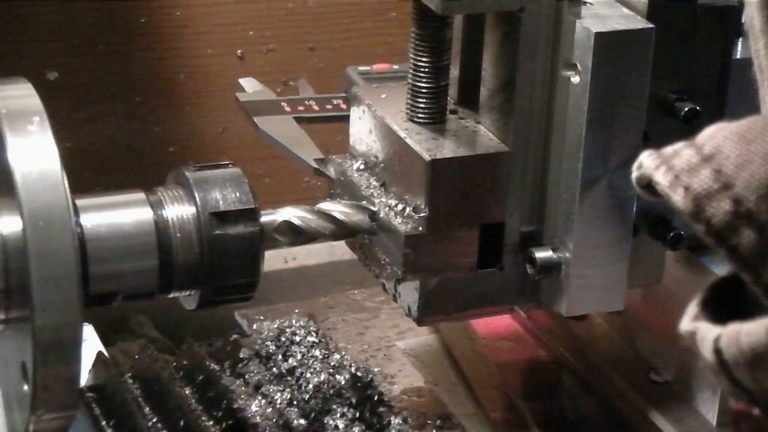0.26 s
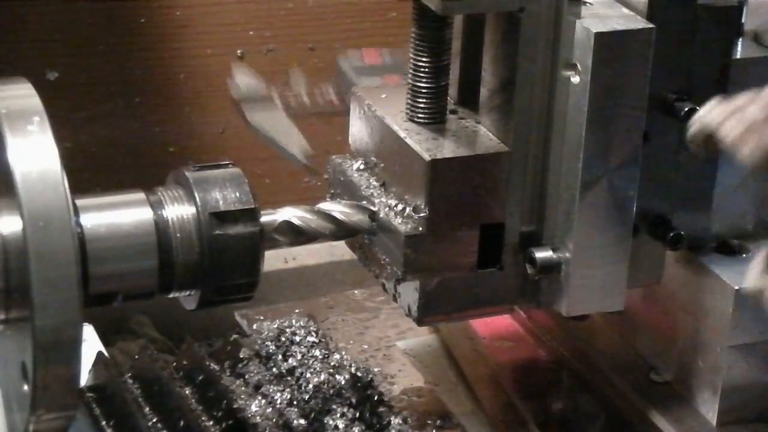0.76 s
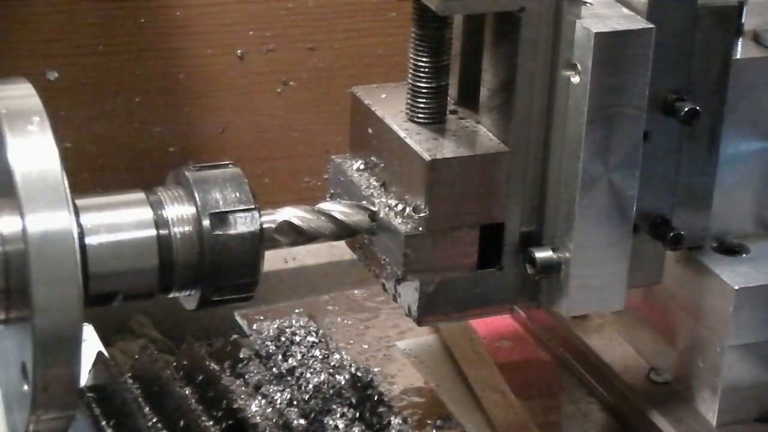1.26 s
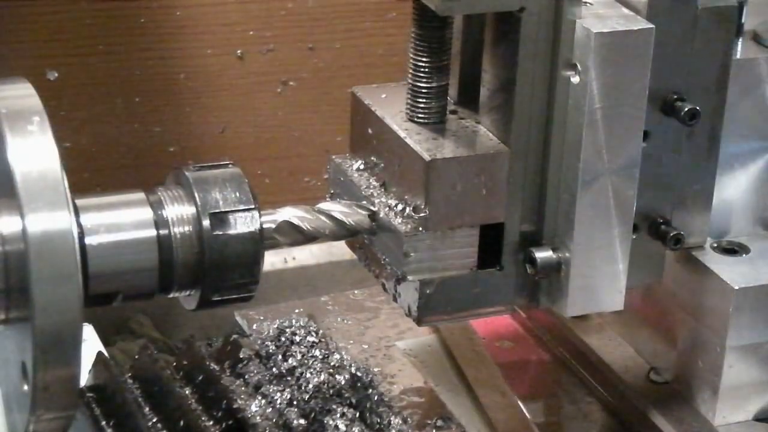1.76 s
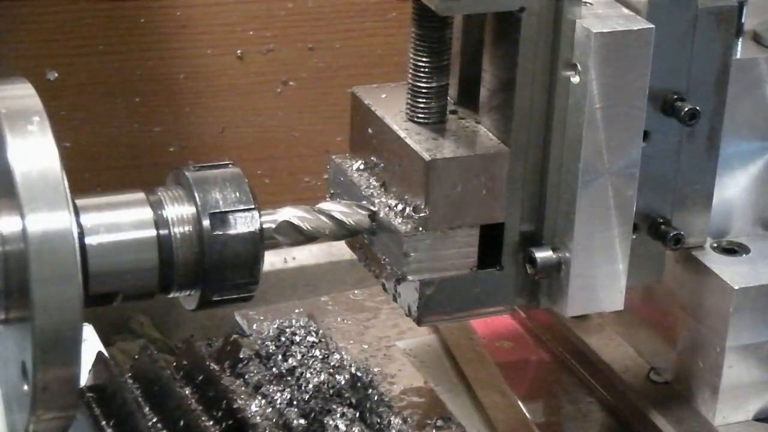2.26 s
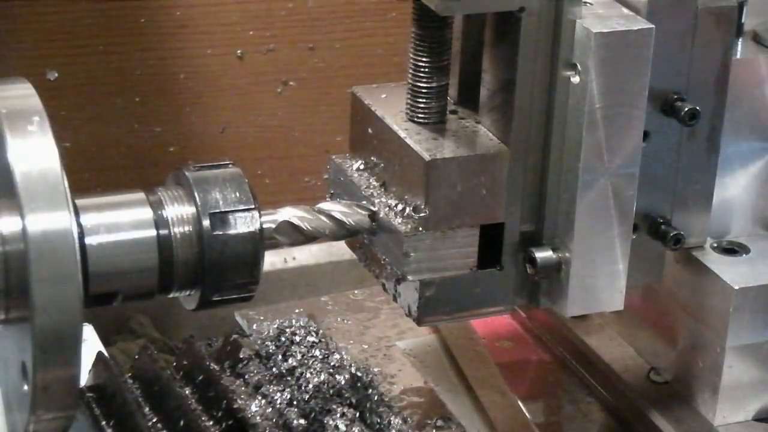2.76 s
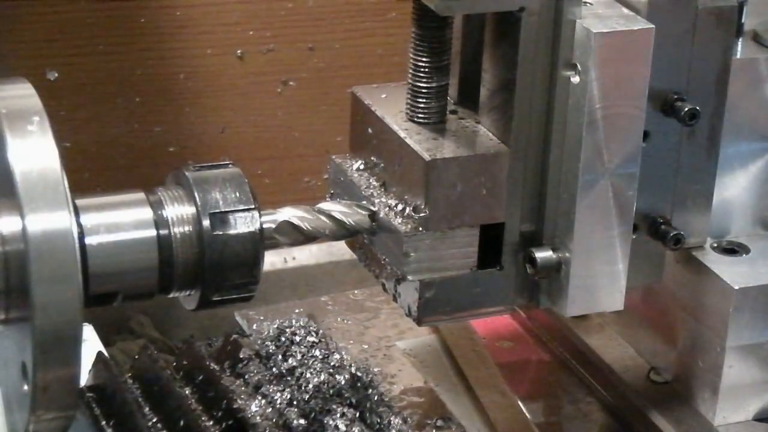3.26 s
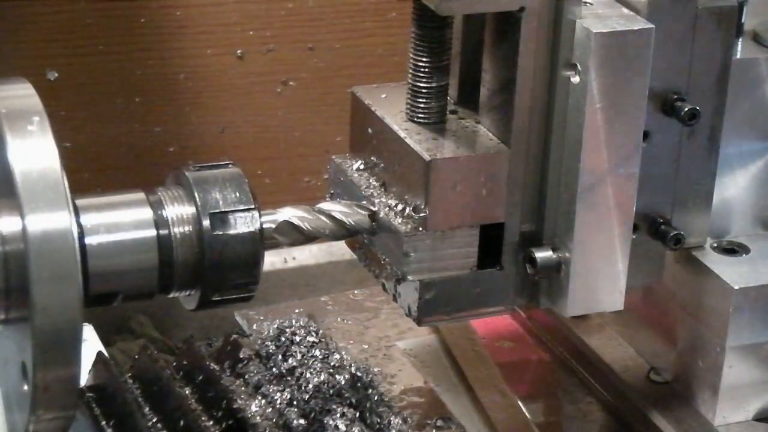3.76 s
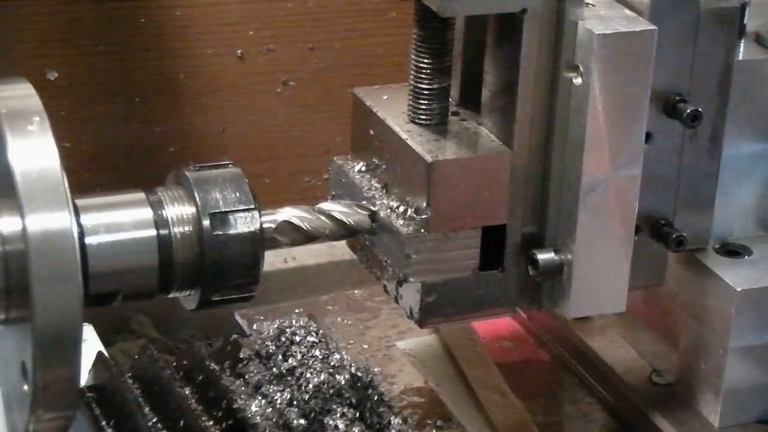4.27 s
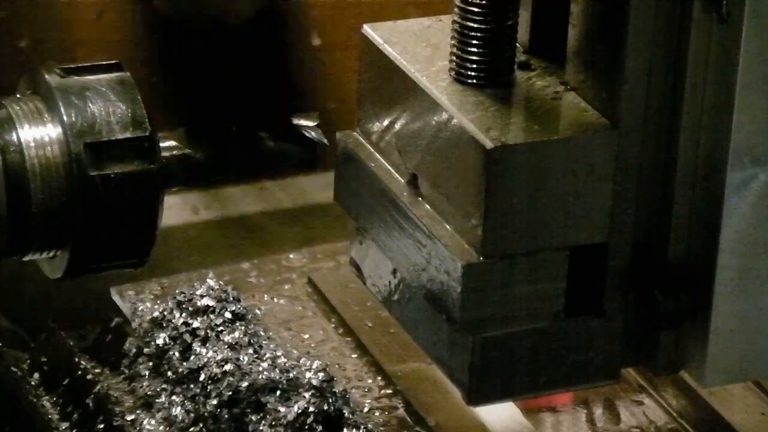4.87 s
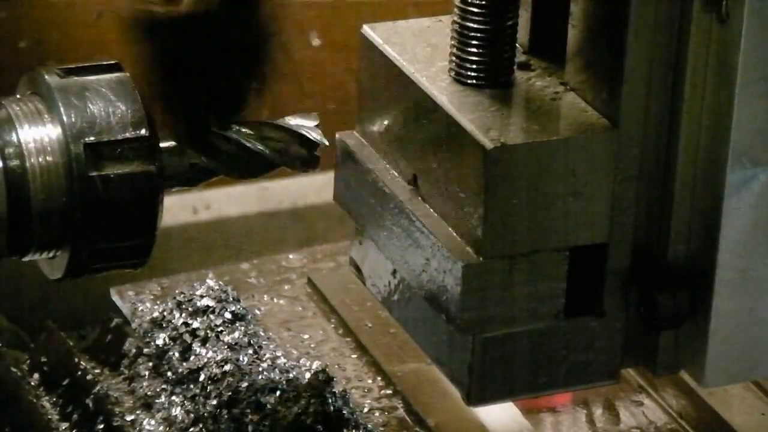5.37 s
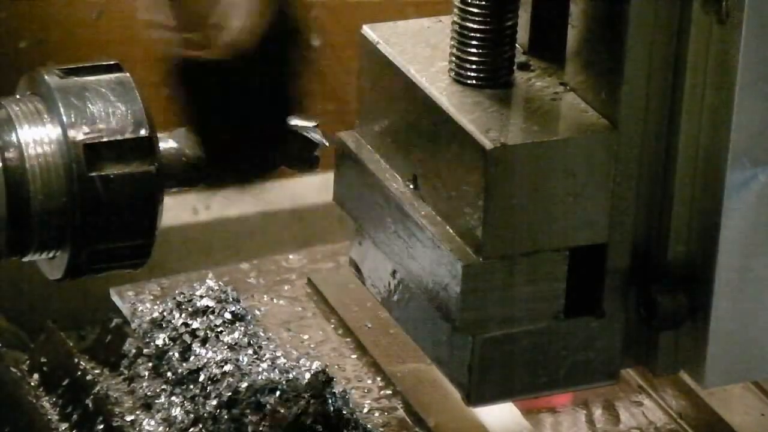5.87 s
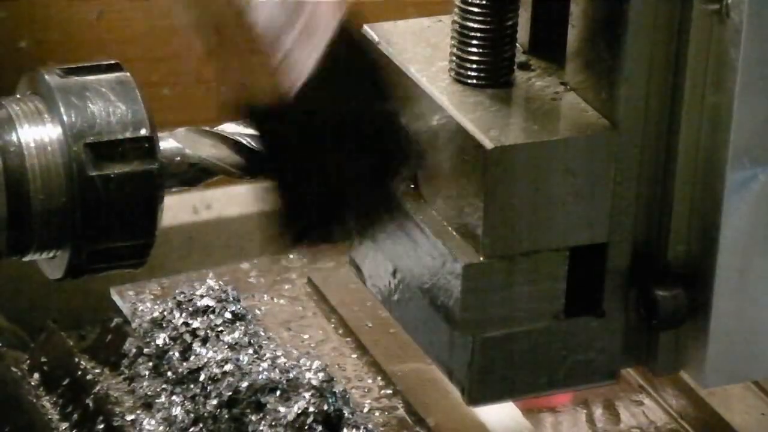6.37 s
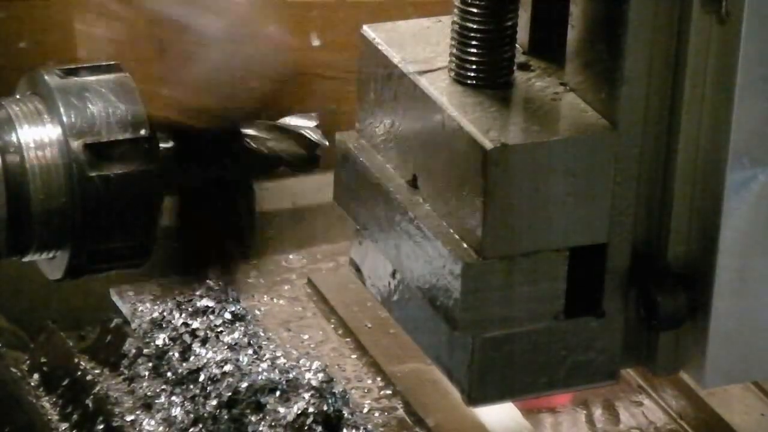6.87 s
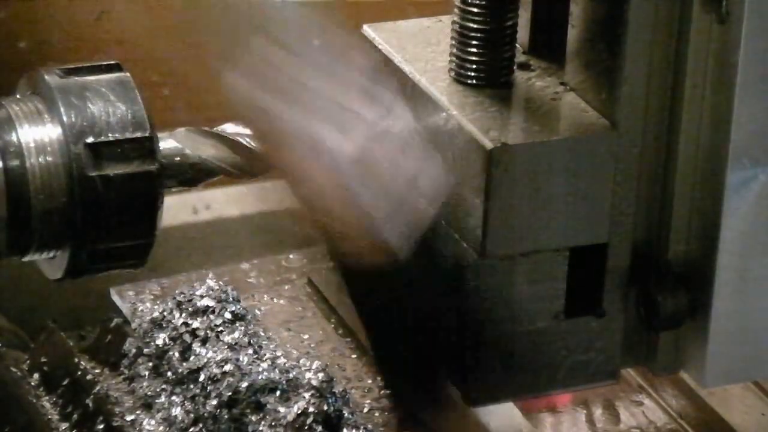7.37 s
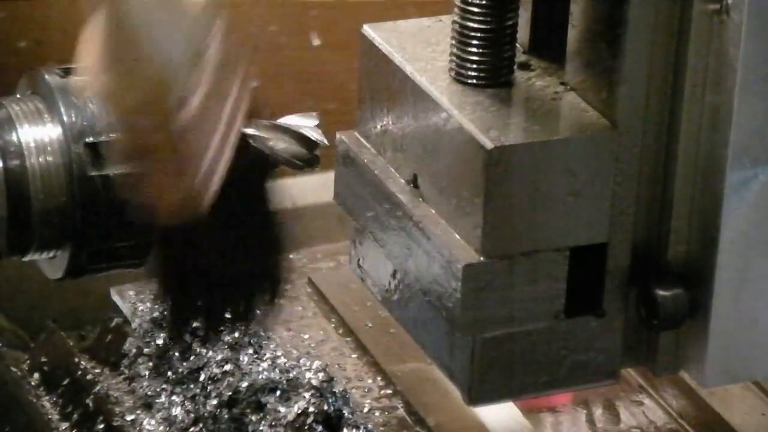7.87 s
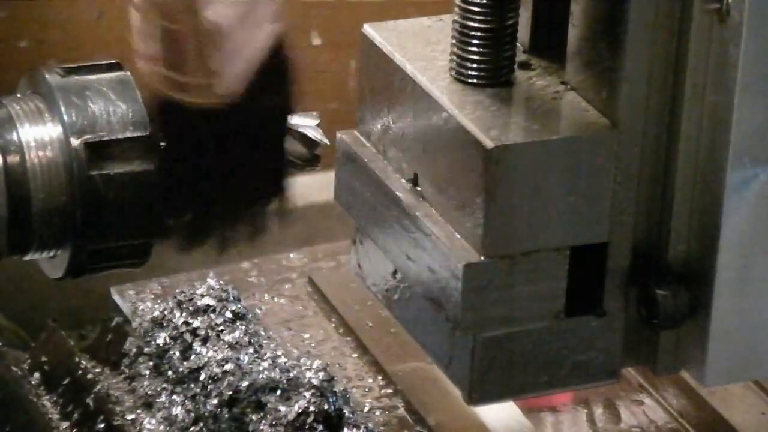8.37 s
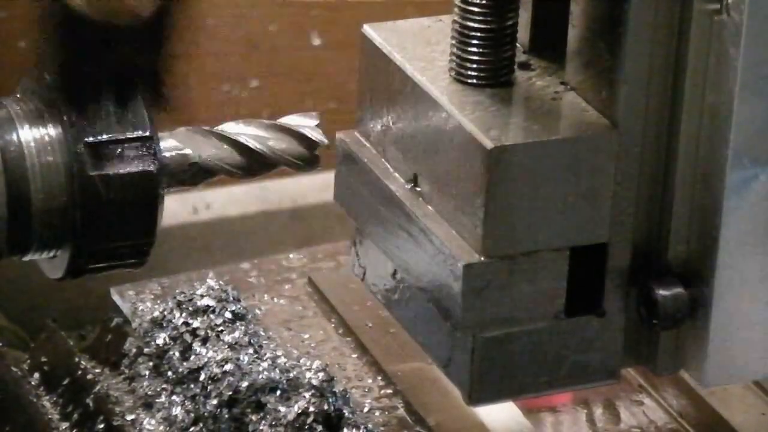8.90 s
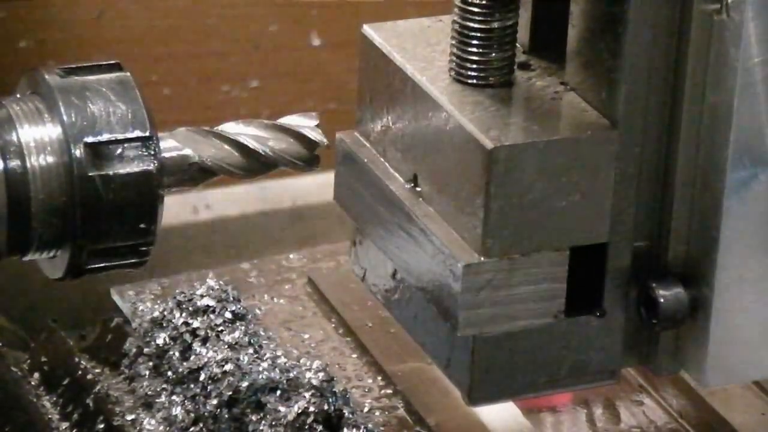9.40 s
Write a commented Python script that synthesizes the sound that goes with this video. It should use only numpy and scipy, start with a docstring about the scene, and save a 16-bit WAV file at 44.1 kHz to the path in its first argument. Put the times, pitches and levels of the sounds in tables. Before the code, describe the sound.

Someone rummages beside a workbench: steel tools clink, things slide softly over wood, a metal catch snaps and something wooden knocks, then bangs shut. After a split second of dead silence, a bristle brush sweeps metal chips off a steel vise in fourteen quick, hissy strokes, with tiny chips pattering down over a faint low hum. A stereo microphone stands close to the vise in a small workshop.

```python
"""A bristle brush sweeps metal chips off the steel vise of a small lathe in fourteen quick strokes, over a
faint low hum; the tips flick and scrape, loosened chips patter down. Before that, someone rummages beside the
bench: tools clink, things slide and knock, something wooden bangs shut, and then the sound drops out briefly.
Blows are clicks that ring resonances; friction is dense tiny impacts. A small stereo microphone stands close to
the vise."""
import sys
import numpy as np
from scipy import signal
from scipy.fft import rfft, irfft, next_fast_len
from scipy.io import wavfile
from scipy.ndimage import uniform_filter1d

SR = 44100
rng = np.random.default_rng(int(sys.argv[2]) if len(sys.argv) > 2 else 0)


def pcm_store(signal):
    """Save signal as 16-bit PCM."""
    levels = np.round(np.clip(np.atleast_2d(signal), -1, 1) * 32767)
    wavfile.write(sys.argv[1], SR, levels.astype(np.int16).T)


N = 425124
TIME = np.arange(N) / SR
SILENCE_S = (4.778, 4.888)

# stereo width of diffuse sound, close sound and background hiss: f/Hz, side minus mid/dB
DIFFUSE_WIDTH = [(60, -22.5), (400, -19.5), (1300, -26.5), (2400, -17), (4400, -9), (8000, -5), (15000, 3)]
NEAR_WIDTH = [(500, -25), (2400, -19), (4400, -10.5), (8000, -7.5), (15000, -2.5)]
HISS_WIDTH = [(60, -17), (700, -8.5), (2400, -7), (8000, -2), (15000, 0)]


def undb(db):
    """Decibels to gain."""
    return 10 ** (np.asarray(db) / 20)


def unit(x):
    """Scale to rms 1."""
    return x / np.sqrt(np.mean(x ** 2))


def gain_at(points, hz):
    """Gain from (f/Hz, level/dB) points on a log-frequency axis."""
    f, db = np.transpose(points)
    return undb(np.interp(np.log(hz + 1), np.log(f), db))


def shape(x, response):
    """Filter by a function of frequency."""
    size = next_fast_len(x.shape[-1] + SR // 10)
    hz = np.fft.rfftfreq(size, 1 / SR)
    return irfft(rfft(x, size) * response(hz), size)[..., :x.shape[-1]]


def colour(x, points):
    """Filter by (f/Hz, level/dB) points; rms 1."""
    return unit(shape(x, lambda hz: gain_at(points, hz)))


def resonate(x, modes, leak=0):
    """Parallel resonances (f/Hz, width/Hz, gain/dB); the share leak bypasses them."""
    return shape(x, lambda hz: leak + sum(undb(db) * 1j * hz * w / (f * f - hz * hz + 1j * hz * w)
                                          for f, w, db in modes))


def stereo(pair, width):
    """Mid and side to left and right: alike in the bass, wider in the treble."""
    side = shape(pair[1], lambda hz: gain_at(width, hz))
    return np.array([pair[0] + side, pair[0] - side])


def grains(rate_hz, scatter_db):
    """Two trains of tiny uneven impacts at the same random moments."""
    struck = rng.random(N) < rate_hz / SR
    impacts = rng.standard_normal((2, N)) * struck
    return impacts * undb(scatter_db * np.clip(rng.standard_normal(N), -2, 2))


def movement(at_s, run_up_s, held_s, db, t60_s=0.52):
    """Gain of one movement: speeds up, holds, dies away."""
    rise = np.clip((TIME - at_s) / run_up_s + 1, 0, 1) ** 2
    coast_s = np.maximum(TIME - at_s - held_s, 0)
    return undb(db) * rise * 1000 ** (-coast_s / t60_s)


def surges(table):
    """Gain with smooth humps and dips."""
    return undb(sum(db * np.exp(-((TIME - at_s) / half_s) ** 2) for at_s, half_s, db in table))


def waver(rate_hz, depth_db):
    """Randomly wandering gain."""
    hold = int(SR / rate_hz)
    steps = rng.standard_normal(1000)[np.arange(N) // hold % 1000]
    return undb(depth_db * uniform_filter1d(steps, size=hold))


def room(onset_s=0.002):
    """Stereo impulse response of the small workshop; the treble dies first."""
    decays = [(100, 0.39), (260, 0.53), (700, 0.53), (1840, 0.51), (4850, 0.55), (12800, 0.3)]  # reverberation: f/Hz, T60/s
    t = TIME[:SR]
    noise = rng.standard_normal((2, SR))
    centres = np.log([hz for hz, _ in decays])
    tail = 0
    for (_, t60_s), pick in zip(decays, np.eye(len(centres))):
        band = shape(noise, lambda hz: np.interp(np.log(hz + 1), centres, pick))
        tail += band * 1000 ** (-t / t60_s) / np.sqrt(t60_s)
    tail *= np.clip(t / onset_s - 0.5, 0, 1)
    return stereo(unit(tail) / np.sqrt(SR), DIFFUSE_WIDTH)


def blows(hits, modes, echo, tone_db, rattle, rattle_t60_s, leak, gain_db, main_db, main_q, soft_hz):
    """A click and a short chatter ring an object; the tone falls away either side of its main resonance.
    hits: t/s, relative level/dB, main f/Hz, fall below/(dB/oct), fall above/(dB/oct), room send/dB"""
    edges_hz = [60, 400, 1400, 3500, 8000, 16000]  # edges of the tone_db bands (thud, body, clack, ring, tick): f/Hz
    bands_hz = list(zip(edges_hz, edges_hz[1:]))
    filters = [signal.butter(3, pair, "band", fs=SR, output="sos") for pair in bands_hz]
    soft_contact = signal.butter(2, soft_hz, fs=SR, output="sos")
    out = np.zeros((2, N + 2 * SR))
    t = TIME[:SR // 4]
    click = 1.0 * (t == 0)
    for at_s, db, main_hz, fall_below, fall_above, room_db in hits:
        octaves = np.log2(bands_hz).mean(axis=1) - np.log2(main_hz)
        bands_db = np.array(tone_db) + octaves * np.where(octaves < 0, fall_below, -fall_above)
        chatter = rattle * rng.standard_normal((2, len(t))) * 1000 ** (-t / rattle_t60_s)
        force = np.array([click + chatter[0], chatter[1], click])  # mid, side, room feed
        ring = signal.sosfilt(soft_contact, resonate(force, modes, leak))
        # the spot struck favours some modes
        ring = resonate(ring, [(main_hz, main_hz / main_q, main_db)], leak=0.72)
        direct, radiated = 0, 0
        for sos, band_db in zip(filters, bands_db):
            band = signal.sosfilt(sos, ring)
            peak_rms = np.sqrt(uniform_filter1d(band[0] ** 2, size=110).max())
            part = band[:2] * undb(db + band_db + gain_db) / peak_rms
            direct += part
            radiated += unit(band[2]) * np.std(part[0])  # clean ring, energy of the whole blow
        sound = undb(room_db) * signal.fftconvolve(radiated[None], echo, axes=1)
        sound[:, :len(t)] += stereo(direct, NEAR_WIDTH)
        start = int(at_s * SR)
        out[:, start:start + sound.shape[1]] += sound
    return out[:, :N]


def shop_hiss(level_db=-60):
    """Steady noise of the quiet shop."""
    spectrum = [(18, -36.5), (32, -9.5), (56, 6), (85, -2.5), (130, -3.5), (190, -9.5), (290, -6.5),
                (640, -12), (1600, -13.5), (6500, -16.5), (9200, -17), (10500, -24), (15500, -26.5)]  # noise floor: f/Hz, relative level/dB
    return stereo(colour(rng.standard_normal((2, N)), spectrum), HISS_WIDTH) * undb(level_db)


def electric_ticks(rate_hz=46.875, share=0.65):
    """Faint one-sided electrical ticks on a steady beat, many skipped."""
    beats = (np.arange(int(N / SR * rate_hz)) * SR / rate_hz).astype(int)
    chance, size = rng.random((len(beats), 2)).T
    ticks = np.zeros(N)
    ticks[beats] = 0.0034 * (chance < share) * (1 + 0.5 * size)
    return ticks


def tool_clinks(echo):
    """Steel tools touch, chatter and ring."""
    hits = [(0.843, -53, 1700, 7, 4, 4), (0.937, -46.5, 2300, 7.5, 6, 5), (0.973, -28, 3960, 9.5, 4, -5.5),
            (1.121, -47, 3040, 8.5, 6.5, 7.5), (1.172, -40, 2940, 15, 5.5, -5.5),
            (1.832, -33, 5960, 8.5, 5, 5.5), (1.835, -30, 5900, 15, 10, -10), (2.037, -49, 5370, 5, 18, 1),
            (2.102, -46.5, 3380, 6.5, 13, 1)]  # contacts: columns as in blows()
    modes = [(2050, 180, -39), (2840, 390, -8), (3600, 180, -10), (4340, 150, 1), (4650, 91, 3.5),
             (5010, 100, 3), (5460, 170, 5), (5780, 150, -1), (6160, 450, -6), (7000, 520, -24),
             (8800, 220, -9), (10400, 300, -13), (10900, 400, -15)]  # steel resonances: f/Hz, width/Hz, gain/dB
    return blows(hits, modes, echo, tone_db=[13.5, 1, 0.5, -1, -2], rattle=0.85, rattle_t60_s=0.045,
                 leak=0.17, gain_db=0, main_db=4, main_q=3.9, soft_hz=14000)


def dragging(slips):
    """Things pushed over the wooden bench: dense slips make a rub, a hollow rumble and a dry hiss."""
    pushes = [(1.38, 0.38, 0.54, -62, -62, -64), (1.45, 0.059, 0.065, -56, -64.5, -65.5),
              (2.3, 0.35, .71, -64, -67, -66), (2.435, .015, 0.014, -74, -56, -56.5),
              (3.29, 0.058, 0.013, -38, -47, -44.5), (3.47, 0.076, 0.06, -53, -61, -56),
              (3.69, 0.077, 0.06, -45.5, -50, -61), (3.976, 0.089, 0.0084, -53, -50, -50),
              (4.15, 0.6, 0.57, -60.5, -58, -64.5), (4.5, 0.14, 0.025, -63, -72, -73),
              (4.755, 0.023, 0.018, -58, -61, -67)]  # full speed t/s, run-up/s, held/s, relative rub/dB, rumble/dB, hiss/dB
    # friction spectra: f/Hz, relative level/dB
    rub = [(300, -11.5), (520, -1.5), (660, 4.5), (820, 2), (1050, 1), (1400, -0.5), (2200, -4.5),
           (4000, -51)]
    rumble = [(60, -20.5), (115, 7.5), (150, 3), (190, -11), (250, 5.5), (350, -0.5), (470, 3),
              (650, -30.5)]
    hiss = [(1200, -28.5), (2600, 3), (4500, -0.5), (6000, -4), (7500, -9), (10000, -12.5), (12500, -22.5),
            (15500, -29.5)]
    out = 0
    for layer, (spectrum, gain_db) in enumerate([(rub, -1), (rumble, -2), (hiss, 1)]):
        motion = sum(movement(at_s, run_up_s, held_s, levels_db[layer])
                     for at_s, run_up_s, held_s, *levels_db in pushes)
        out += undb(gain_db) * colour(slips, spectrum) * motion
    return out


def light_taps(echo):
    """Light things ring briefly as they are picked up and set down."""
    hits = [(1.455, -51, 721, 2.2, 5, -3), (1.619, -46.5, 645, 7.8, 13, -7),
            (4.166, -43, 1720, 5.8, 3.7, 5), (4.43, -40, 1570, 9.9, 4.5, -.7),
            (4.487, -45.5, 2100, 5.9, 9.3, 2.5), (4.529, -46, 2010, 1.1, 5.3, -4),
            (4.651, -38, 1620, 2.3, 2, 0.5), (4.746, -39.5, 1900, 1.5, 5.2, -9)]  # contacts: columns as in blows()
    modes = [(247, 24, 27), (430, 57, 6), (1020, 370, -2.5), (1560, 25, 1), (1910, 56, -9.5),
             (2030, 150, -18), (3080, 350, -16), (5050, 1350, 3)]  # object resonances: f/Hz, width/Hz, gain/dB
    return blows(hits, modes, echo, tone_db=[-1.3, -1.6, -0.39, 3.4, -2.6], rattle=0.29,
                 rattle_t60_s=0.066, leak=0.29, gain_db=1.5, main_db=-4, main_q=8.6, soft_hz=9000)


def metal_runner():
    """A metal runner sings faintly as it slides."""
    modes = [(1385, 120, 5.5), (4400, 72, -0.5), (10900, 500, -16)]  # runner resonances: f/Hz, width/Hz, gain/dB
    slide = (2.5, 0.7, 0.6, -60)  # t/s, run-up/s, held/s, level/dB
    return unit(resonate(rng.standard_normal((2, N)), modes)) * movement(*slide)


def wood_knocks(echo):
    """Wood knocks and bangs shut, with little chatter."""
    hits = [(2.426, -44.5, 2890, 6, 14, 2), (3.12, -17, 833, 6.6, 4.8, .8), (3.745, -13.5, 1550, 5, 14, -3),
            (3.752, -8.5, 2050, 5.3, 9.6, -1), (3.777, -19.5, 2000, 1.9, 5.9, 1),
            (3.814, -26, 1600, 0.6, 5.7, -1.2)]  # contacts: columns as in blows()
    modes = [(116.8, 3.5, 0.5), (142, 15, 1.5), (268, 23, -6), (283, 14, -4.5), (359, 15, -2),
             (386, 4.6, 2.5), (664, 310, -1), (790, 35, -4.5), (1140, 230, -4.5), (1230, 26, 3),
             (1570, 110, 3), (1750, 110, 5.5), (1864, 63, 6), (1950, 68, 14.5), (2104, 33, 10),
             (2293, 41, -21), (4770, 570, -5.5), (5700, 950, -11)]  # wood resonances: f/Hz, width/Hz, gain/dB
    return blows(hits, modes, echo, tone_db=[1, 0, -1, 0.5, 1], rattle=0.12, rattle_t60_s=0.055,
                 leak=0.1, gain_db=-1.5, main_db=2, main_q=1.7, soft_hz=7050)


def squeaks(slips):
    """Rubbing surfaces squeak: their slips ring one narrow resonance per squeak."""
    rubs = [(2.85, .05, .02, -62, 3240, 70), (2.84, .12, .03, -71, 11300, 500),
            (3.46, .03, .025, -46, 650, 60), (4.2, .1, .17, -67, 10000, 700)]  # t/s, run-up/s, held/s, level/dB, f/Hz, width/Hz
    out = 0
    for at_s, run_up_s, held_s, db, hz, width_hz in rubs:
        ring = signal.lfilter(*signal.iirpeak(hz, hz / width_hz, fs=SR), slips)
        out += unit(ring) * movement(at_s, run_up_s, held_s, db, t60_s=0.4)
    return out


def catch_snaps(echo):
    """A metal catch snaps and rings."""
    hits = [(3.022, -16.5, 2850, 4.16, 4.2, -0.73), (3.296, -26, 2050, 7, 4.5, -1.8)]  # contacts: columns as in blows()
    modes = [(1090, 240, -15), (1900, 190, -8.5), (2850, 330, -10), (3010, 140, -14.5), (5270, 260, 8),
             (5500, 180, -7), (5960, 260, 2), (6160, 1100, -11.5), (9120, 200, -12.5), (10800, 780, -6)]  # catch resonances: f/Hz, width/Hz, gain/dB
    return blows(hits, modes, echo, tone_db=[0.5, -1.4, -1.8, 2.3, -1], rattle=0.2, rattle_t60_s=0.046,
                 leak=0.24, gain_db=-0.5, main_db=-0.5, main_q=13, soft_hz=9500)


def room_hum(hum_db=-55.5, drone_db=-60.5, air_db=-59):
    """From the silence on, a wavering hum fills the room's low resonances, with a rush of air."""
    # room resonances: f/Hz, width/Hz, gain/dB
    hum_modes = [(45.4, 3.4, 8.5), (58.6, 13, 4), (77.8, 9.2, 2.5), (124.4, 13.6, 0.5), (143, 1.7, -16)]
    drone_modes = [(190, 20, -34), (222, 4.9, 8), (248.4, 27, 9), (296, 21, -2.5), (325, 12, -5),
                   (423.5, 11.7, 2.5)]
    # level changes: centre t/s, half length/s, rise/dB
    hum_swells = [(5.28, 0.054, -1), (6.55, 0.87, 3.5)]
    drone_swells = [(5.8, 0.43, 5.8), (8.62, 0.33, 6.3)]
    air_spectrum = [(40, -17), (200, -15), (450, -1.5), (700, -5.5), (1500, -1.5), (3000, -6), (6000, -6.5),
                    (9500, -11), (15500, -18.5)]  # shop air: f/Hz, relative level/dB
    hum = undb(hum_db) * surges(hum_swells) * unit(resonate(rng.standard_normal((2, N)), hum_modes))
    drone = unit(resonate(rng.standard_normal((2, N)), drone_modes))
    drone *= undb(drone_db) * surges(drone_swells)
    air = undb(air_db) * colour(rng.standard_normal((2, N)), air_spectrum)
    low = (hum + drone) * waver(rate_hz=10, depth_db=2.5)
    return (stereo(low, DIFFUSE_WIDTH) + stereo(air, HISS_WIDTH)) * (TIME > SILENCE_S[0])


def bristle_pressure(strokes, slide_s=0.03):
    """Bristles load up, slide over the vise edge and spring free; the last ones flick after."""
    pressure = np.zeros(N)
    for at_s, db, load_s, lag_s, flick_db, _ in strokes:
        free_s = at_s + slide_s
        flick_s = free_s + lag_s
        knots_s = [at_s - load_s, at_s - 0.5 * load_s, at_s, free_s, free_s + 0.01,
                   free_s + max(lag_s - 0.015, 0.013), flick_s, flick_s + 0.01, flick_s + 0.054]
        knots_db = [-30, -11, -0.5, 0, -4 + 0.5 * flick_db,
                    flick_db - 3.5, flick_db, flick_db - 7, flick_db - 22]
        pressure += undb(db + np.interp(TIME, knots_s, knots_db, left=-np.inf, right=-np.inf))
    return pressure


def tufts(hiss):
    """Tufts catch and slip on their own, so each band of the hiss flickers separately."""
    edges_hz = [2600, 3600, 4800, 6500, 9000, 11500]  # band edges: f/Hz
    out = 0
    for low_hz, high_hz in zip([0, *edges_hz], [*edges_hz, SR]):
        band = shape(hiss, lambda hz: (hz >= low_hz) & (hz < high_hz))
        out += band * waver(rate_hz=45, depth_db=2.2)
    return unit(out)


def brush(echo, bristle_db=1, scrape_db=-44, chip_db=-21, settle_s=0.37, room_db=-14, pan_db=0.7):
    """Thousands of bristle tips flick over the vise; loosened chips patter down after each stroke."""
    strokes = [(5.014, -47, 0.05, 0.091, -7.5, 0.5), (5.318, -45, 0.023, .063, -4, -2),
               (5.551, -42.5, 0.023, 0.067, -5.5, -1.5), (5.835, -39.5, 0.063, .056, -10.5, 1.5),
               (6.148, -38, .078, 0.025, -11, 1.5), (6.514, -46.5, 0.025, 0.067, -3, -2),
               (6.832, -45.5, 0.01, 0.068, -1.5, -1), (7.131, -46, .014, 0.038, 2.5, 1.5),
               (7.515, -41, 0.086, 0.085, -13.5, 2.5), (7.832, -39.5, 0.058, 0.031, -9.5, -1.5),
               (8.068, -37, 0.022, 0.029, -9.5, -6), (8.322, -41, 0.041, .042, -9, -1.5),
               (8.576, -41, 0.026, 0.081, -14.5, 3), (8.807, -39, 0.013, 0.068, -6, -2.5)]  # t/s, relative level/dB, loading/s, flick lag/s, flick/dB, scrape/dB
    # brush spectra: f/Hz, relative level/dB
    tip_spectrum = [(2000, -11.5), (4500, -4.5), (6500, 0.5), (8500, 1), (9500, 3.5), (12000, -1.5),
                    (15500, -6)]
    scrape_spectrum = [(300, -2.5), (700, -10), (1500, -5), (2000, -2.5), (2700, -2.5), (3100, -0.5),
                       (3700, -3.5), (5500, -0.5), (7000, -4), (11000, -45)]
    pressure = bristle_pressure(strokes)
    bristles = tufts(colour(grains(rate_hz=24000, scatter_db=0), tip_spectrum)) * pressure
    scrape = colour(grains(rate_hz=7000, scatter_db=4.5), scrape_spectrum)
    scrape *= (pressure / pressure.max()) ** 0.67  # grows less than the hiss: fast strokes are brighter
    starts_s, *_, bearing_db = np.transpose(strokes)
    scrape *= undb(np.interp(TIME, starts_s, bearing_db))
    pole = np.exp(-1 / (settle_s * SR))
    falling = signal.lfilter([1 - pole], [1, -pole], pressure)
    chips = colour(grains(rate_hz=20, scatter_db=19), tip_spectrum) * falling
    pair = undb(bristle_db) * bristles + undb(scrape_db) * scrape + undb(chip_db) * chips
    direct = stereo(pair, NEAR_WIDTH) * undb([[pan_db], [-pan_db]])
    return direct + undb(room_db) * signal.fftconvolve(pair[:1], echo, axes=1)[:, :N]


def rustles(slips):
    """Dense slips swell into soft rustles after the last stroke."""
    moves = [(9.22, 0.21, 0.095, -55), (9.46, .16, 0.19, -56)]  # t/s, run-up/s, held/s, level/dB
    spectrum = [(250, -9), (700, -1), (1500, -0.5), (3000, -2.5), (5500, -7.5), (9000, -12.5), (15500, -27)]  # rustle: f/Hz, relative level/dB
    return colour(slips, spectrum) * sum(movement(*row) for row in moves)


def scene():
    """Rummaging, then sweeping, in one room."""
    echo = room()
    impacts = tool_clinks(echo) + catch_snaps(echo) + wood_knocks(echo) + light_taps(echo)
    slips = grains(rate_hz=14000, scatter_db=2)
    singing = metal_runner() + squeaks(slips)
    rubbing = (dragging(slips) + rustles(slips)) * waver(rate_hz=25, depth_db=2.9)
    friction = stereo(rubbing + singing, DIFFUSE_WIDTH)
    return impacts + friction + brush(echo) + shop_hiss() + room_hum() + electric_ticks()


def record(dry):
    """The microphone has a narrow treble notch; the sound drops out briefly; the top is cut."""
    notch_hz, notch_q, top_hz = 7850, 18, 15800
    notched = signal.lfilter(*signal.iirnotch(notch_hz, notch_q, fs=SR), dry)
    live = (TIME < SILENCE_S[0]) | (TIME > SILENCE_S[1])
    return signal.sosfilt(signal.ellip(10, 0.2, 80, top_hz, fs=SR, output="sos"), notched * live)


dry = scene()
out = record(dry)
pcm_store(out)
```